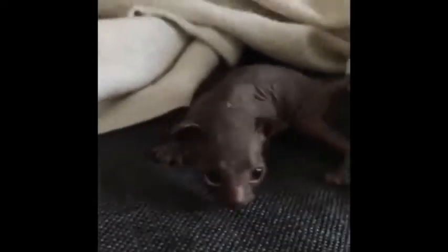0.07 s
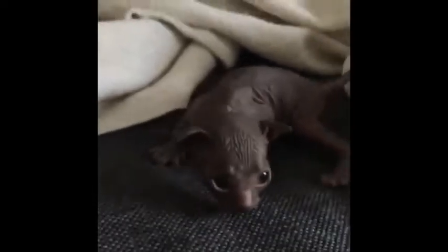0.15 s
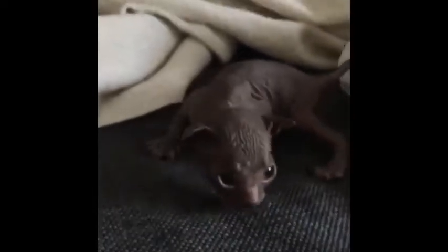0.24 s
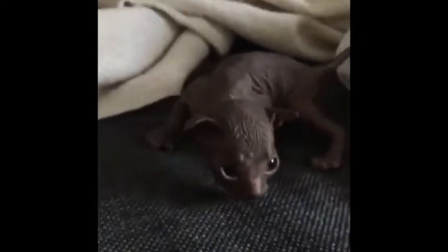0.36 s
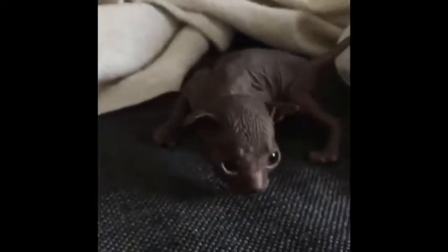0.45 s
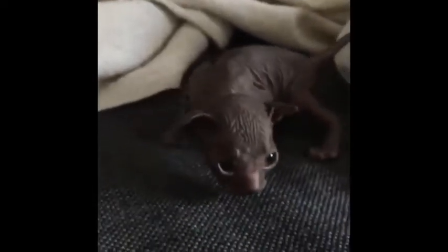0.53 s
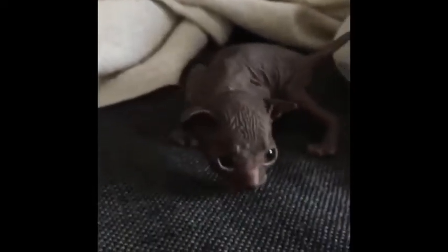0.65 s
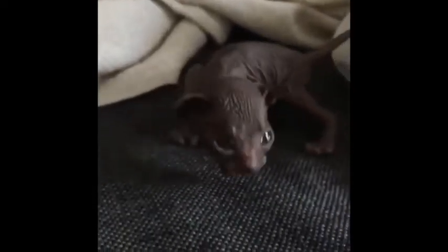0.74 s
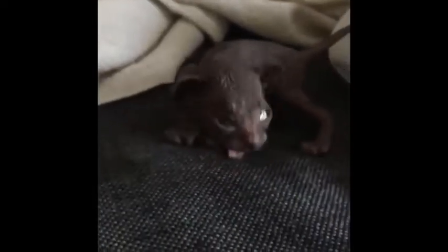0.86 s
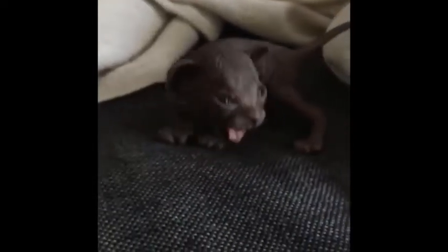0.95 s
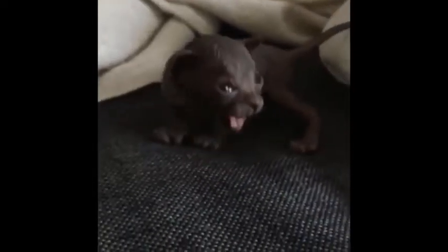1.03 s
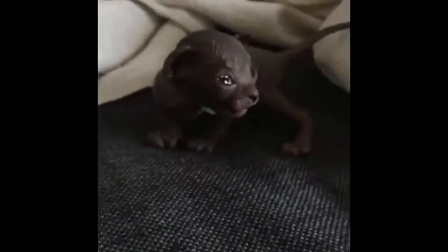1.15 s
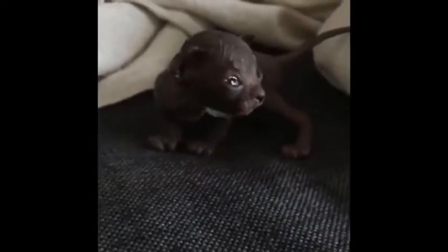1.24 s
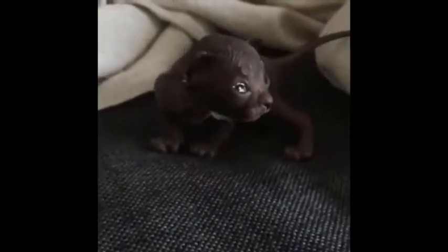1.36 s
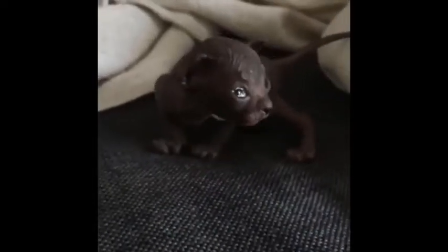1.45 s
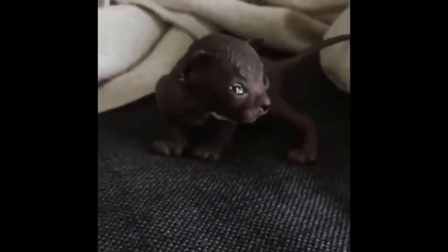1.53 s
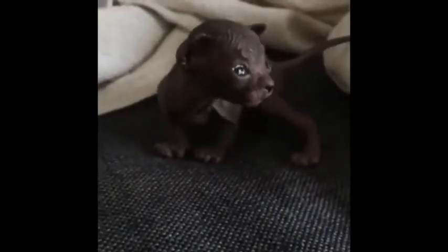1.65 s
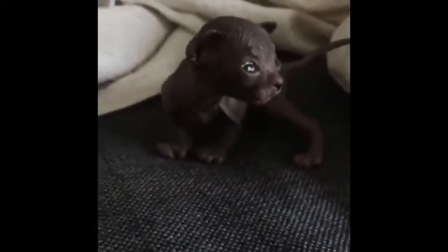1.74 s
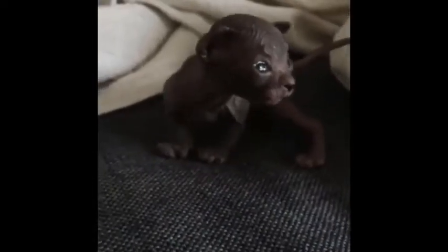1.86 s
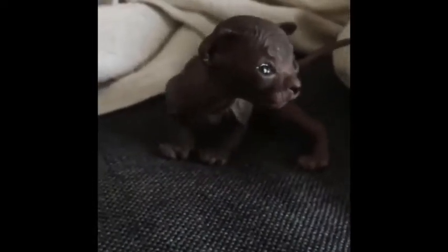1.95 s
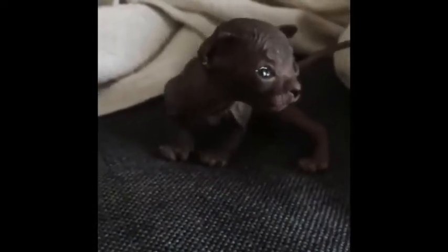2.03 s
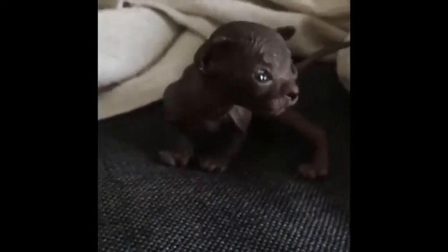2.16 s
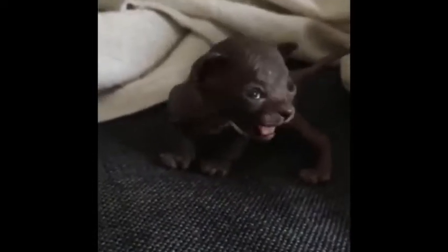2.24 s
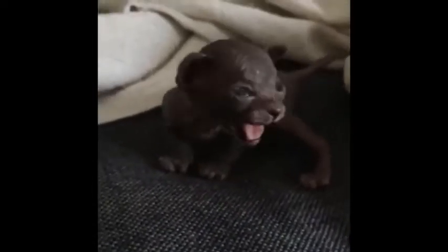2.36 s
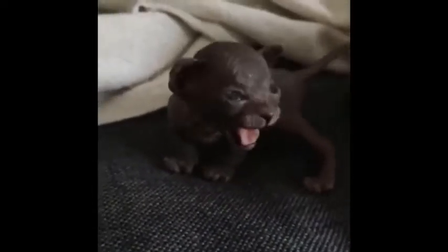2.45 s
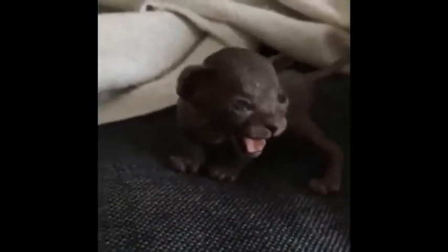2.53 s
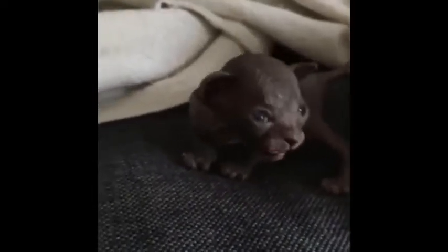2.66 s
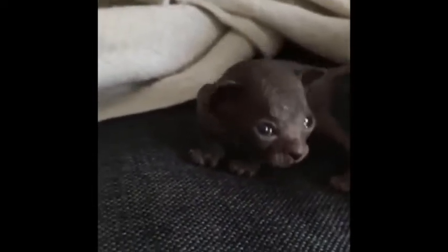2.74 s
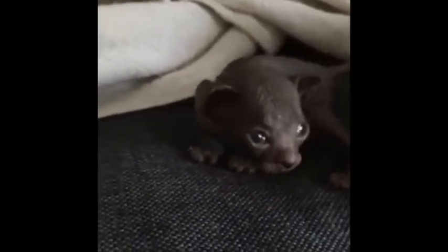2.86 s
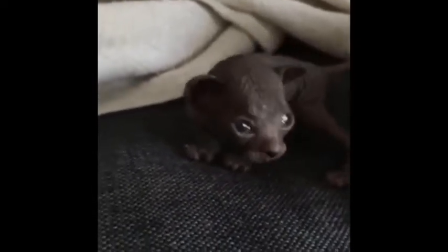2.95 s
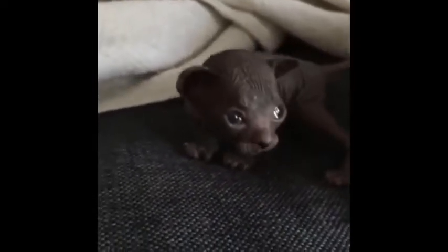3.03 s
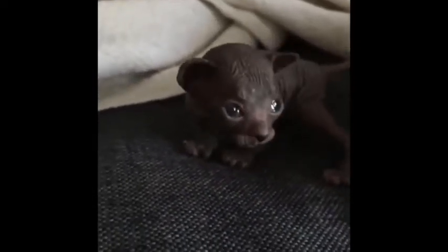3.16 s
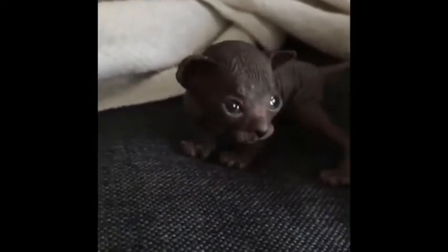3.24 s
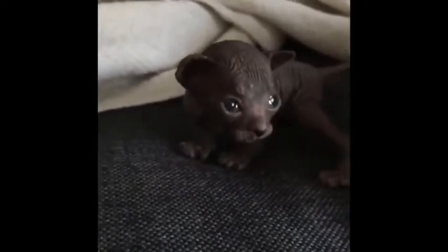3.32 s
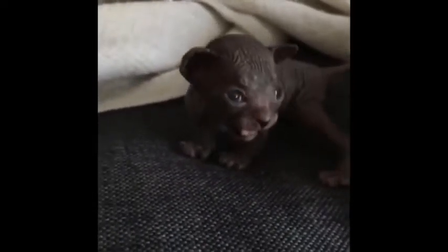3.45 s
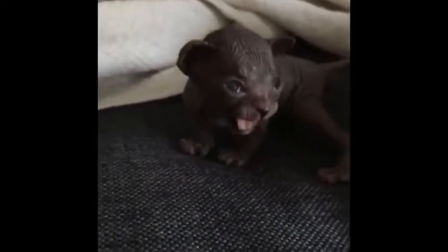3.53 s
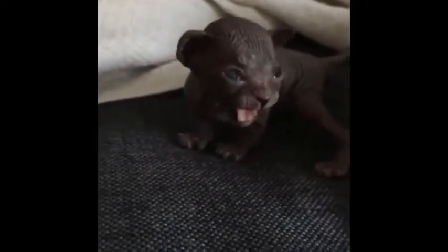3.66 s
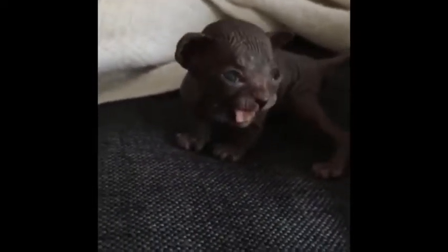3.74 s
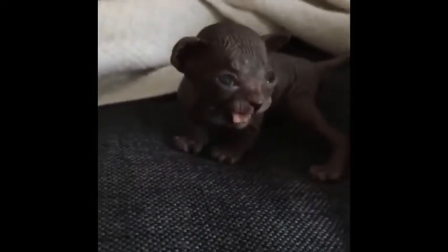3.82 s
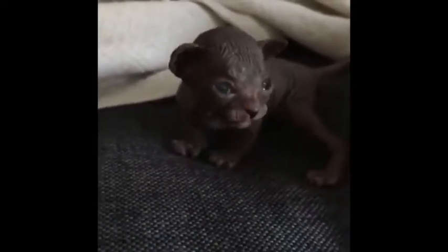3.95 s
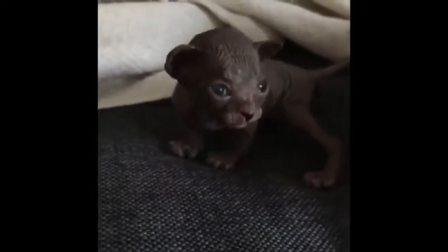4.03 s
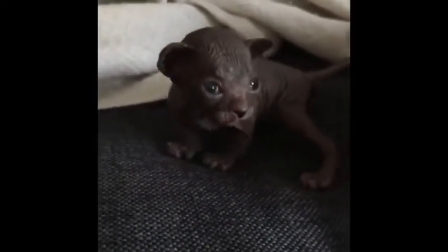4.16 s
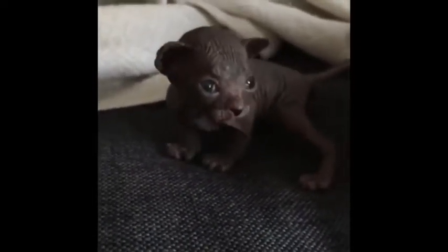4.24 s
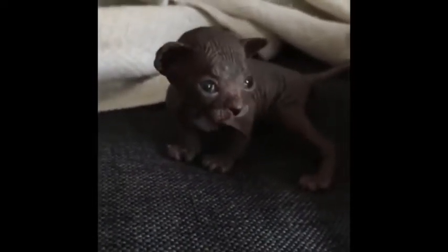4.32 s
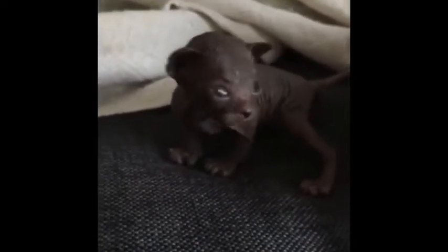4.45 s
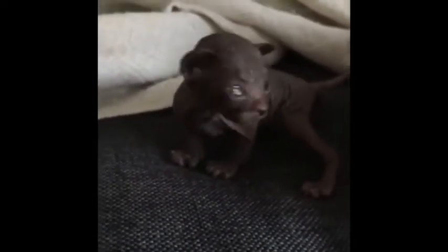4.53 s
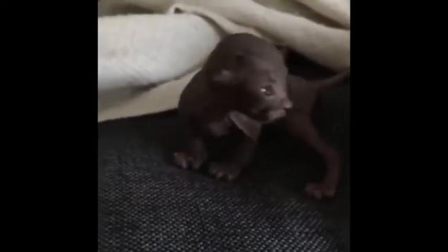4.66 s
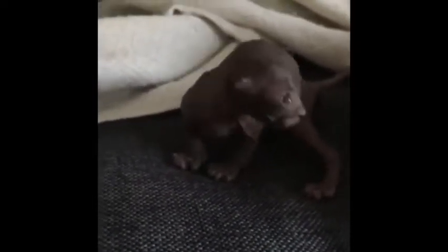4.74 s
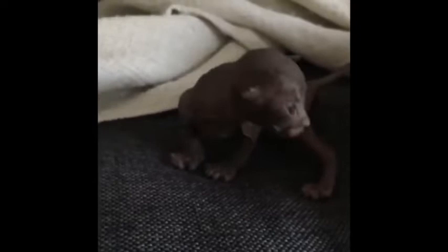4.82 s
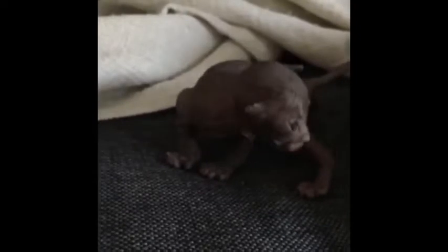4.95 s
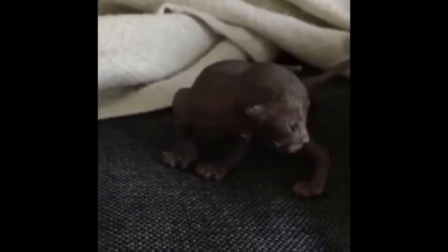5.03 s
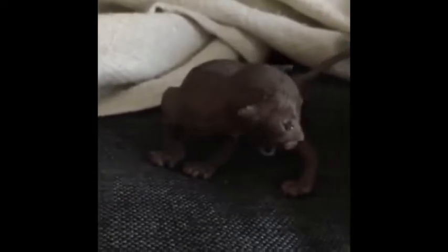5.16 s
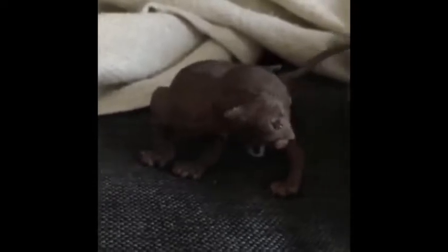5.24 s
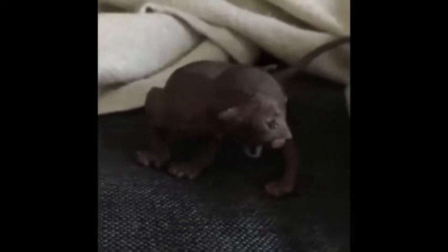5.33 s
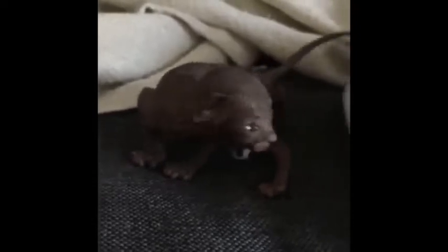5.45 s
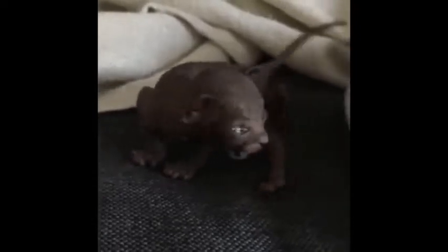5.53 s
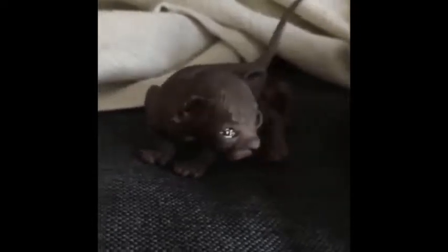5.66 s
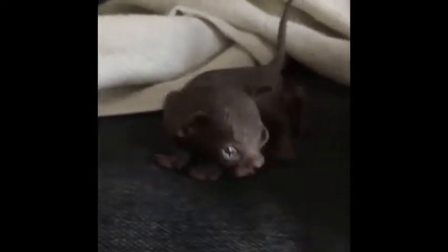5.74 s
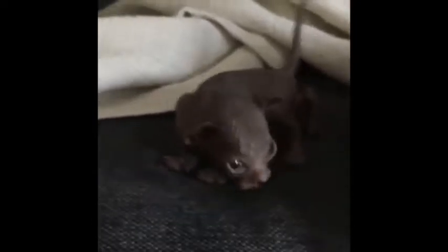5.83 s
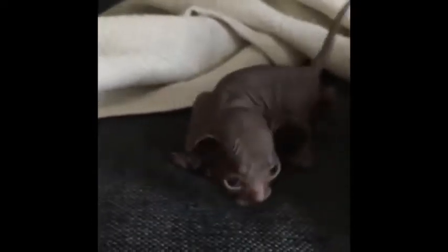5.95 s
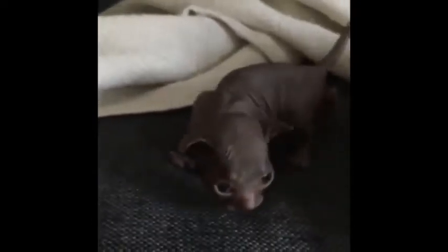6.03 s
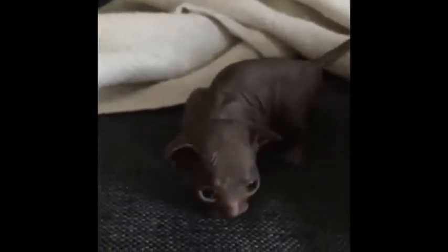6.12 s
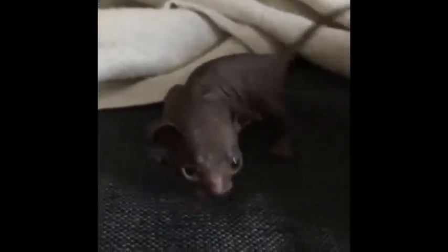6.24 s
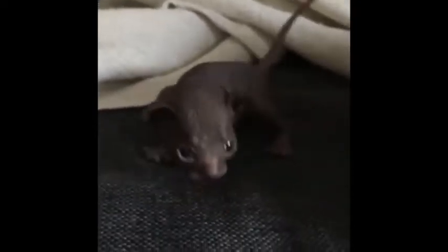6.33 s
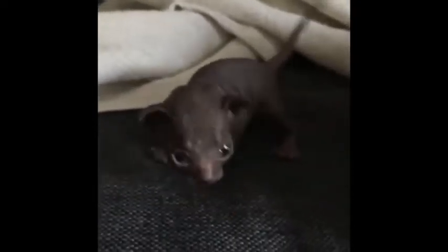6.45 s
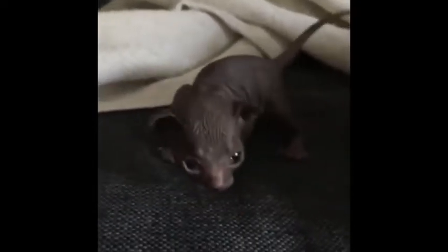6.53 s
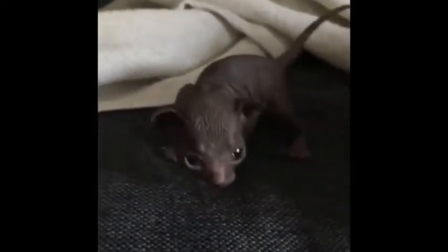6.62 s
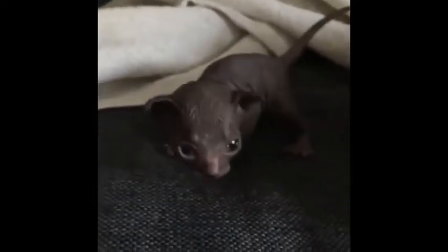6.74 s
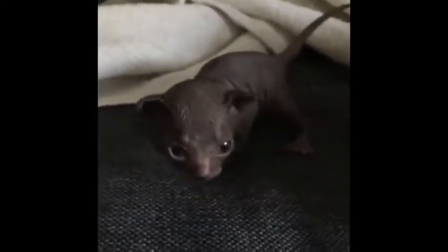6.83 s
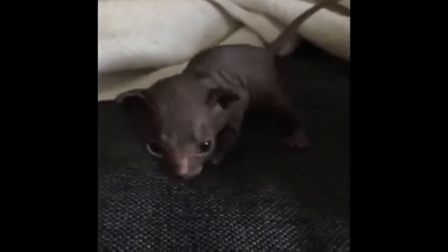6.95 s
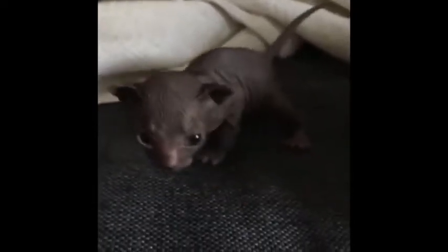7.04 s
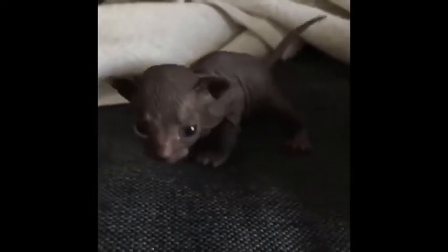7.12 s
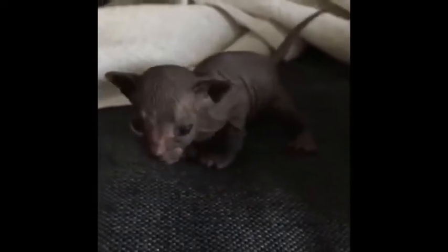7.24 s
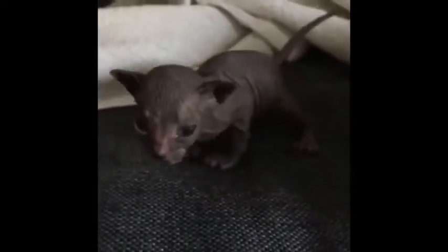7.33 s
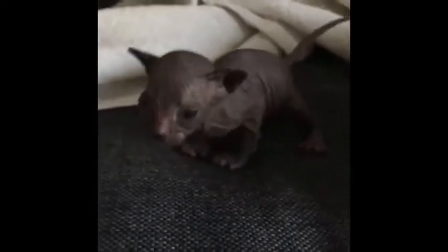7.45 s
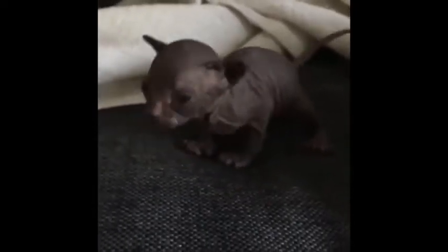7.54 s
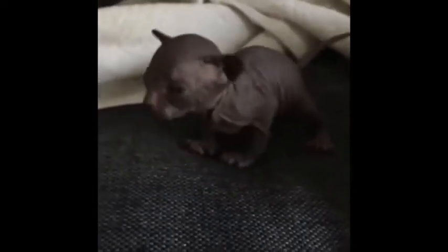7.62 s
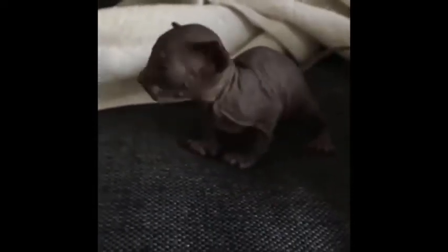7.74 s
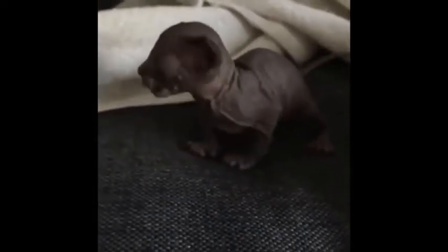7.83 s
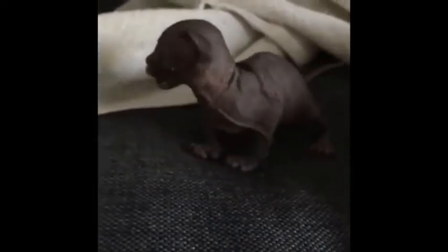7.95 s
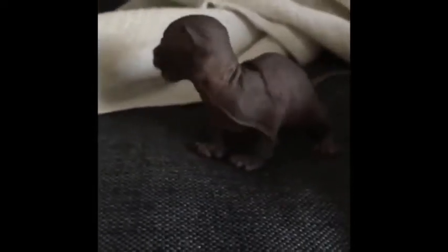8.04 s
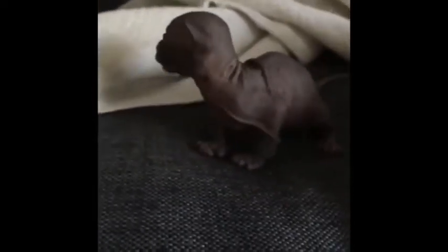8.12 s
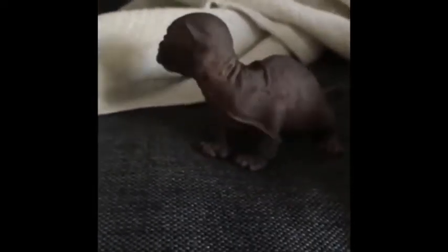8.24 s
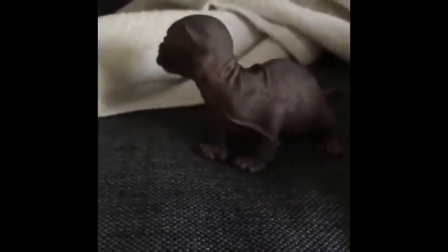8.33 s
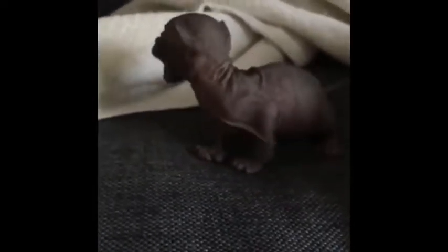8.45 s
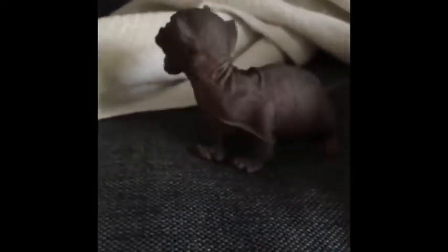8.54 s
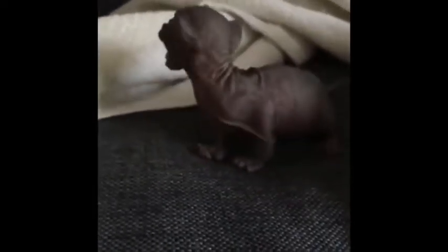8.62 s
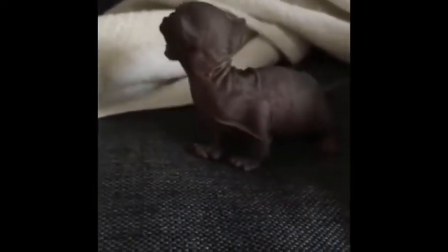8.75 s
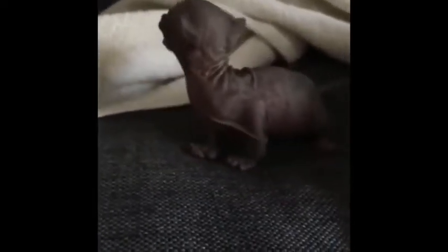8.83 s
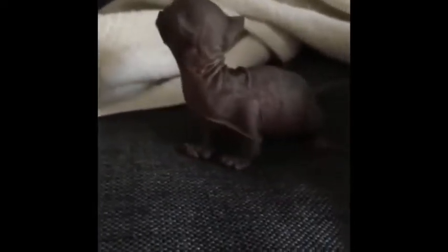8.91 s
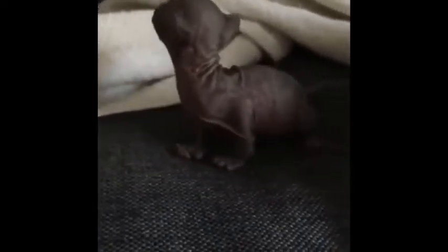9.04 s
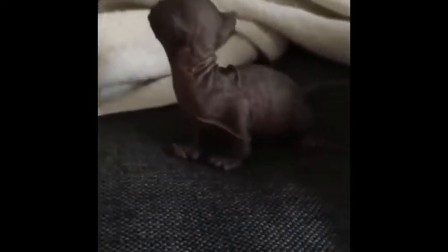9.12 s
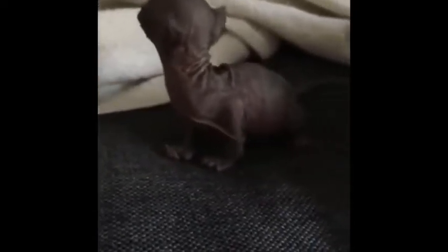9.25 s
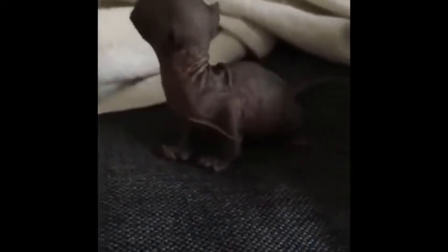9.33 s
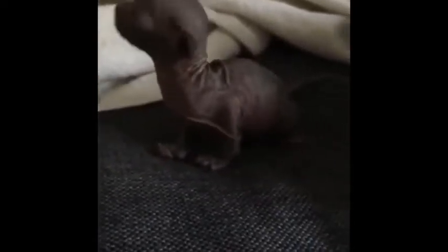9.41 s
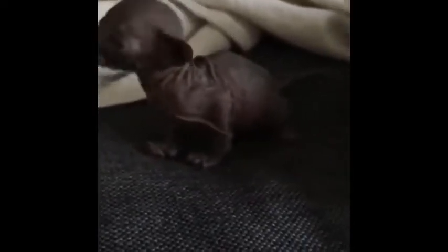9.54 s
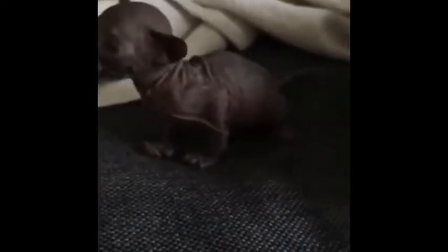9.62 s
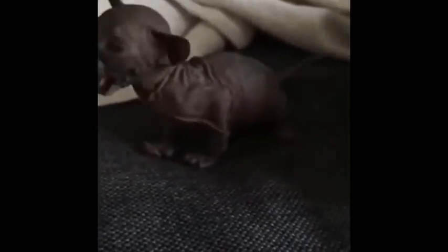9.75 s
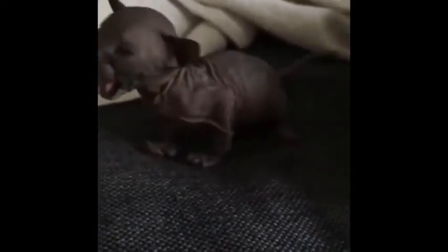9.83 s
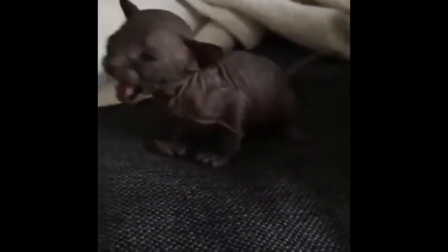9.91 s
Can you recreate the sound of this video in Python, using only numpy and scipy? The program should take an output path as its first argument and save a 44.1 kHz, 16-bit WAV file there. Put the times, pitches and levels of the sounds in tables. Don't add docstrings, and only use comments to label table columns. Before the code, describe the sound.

A soft steady hiss and low rumble run throughout, very close and dry, with barely audible hand bumps on the phone. At 0.75 s a tiny kitten gives a low closed-mouth chirrup and a sharp wet lip smack, then a rasp that clears by 1.2 s into a bright arched cry, ending in a dull lip closure near 1.4 s. A small murmur follows at 1.6. The second mew, 2.3 to 2.85 s, is softer and flicks upward at its end. The third, 3.5 to 4.15, is loudest, rising then falling. The fourth, 5.2 to 5.8, has a long gritty opening and a short cry, then a little chirrup. Cloth rustles gently around 6.3 to 6.8. The fifth, 7.2 to 7.65, has many sticky clicks and a squeaky rise. The sixth, 8.55 to 9.15, jumps from low to high and sags. A seventh starts with chirrups at 9.76 and is cut off.

```python
import sys
import numpy as np
from scipy import signal
from scipy.io import wavfile
from scipy.ndimage import uniform_filter1d

SR = 44100
rng = np.random.default_rng(int(sys.argv[2]) if len(sys.argv) > 2 else 0)


def output_pcm(signal):
    pcm = np.clip(np.atleast_2d(signal).T, -1, 1) * 32767
    wavfile.write(sys.argv[1], SR, np.round(pcm).astype(np.int16))


def how_loud(loudness_db):
    steps = np.asarray(loudness_db, float) / 20
    return 10 ** steps


N = 440118


def evened(x):
    return x / np.sqrt(np.mean(x ** 2) + 1e-20)


def read(points, hz):
    f, value = np.transpose(points)
    return np.interp(np.log(hz + 1), np.log(f + 1), value)


def add(mix, s, sound):
    part = mix[round(s * SR):][:len(sound)]
    part += sound[:len(part)]


def wander(n, span):
    return evened(uniform_filter1d(uniform_filter1d(rng.standard_normal(n), int(span)), int(span)))


def noise(points, patchy_db, swell_db):
    frames, hz = N // 256 + 5, np.fft.rfftfreq(1024, 1 / SR)
    real, imaginary, patches = rng.standard_normal((frames, 513, 3)).T
    patches = uniform_filter1d(patches, size=14, axis=0)
    patches = evened(uniform_filter1d(patches, size=12, axis=1))
    level_db = read(points, hz)[:, None] + patchy_db * patches + swell_db * wander(frames, 6.6)
    z = (real + 1j * imaginary) * how_loud(level_db)
    return evened(signal.istft(z, nperseg=1024, noverlap=768)[1][:N])


def floor_hiss():
    # (frequency [Hz], density [dB per Hz])
    hiss_spectrum = [(15, -49), (28, -23), (79, -2.5), (230, -7.5), (500, -13.5), (877, -14.5),
                     (13400, -23), (14900, -30.5)]
    return how_loud(-65 - 1.11) * noise(hiss_spectrum, 1.0, 0.2357)


def cloth_rustle():
    # (time [s], level [dB])
    stirring = [
        (6.0, -79),
        (6.3, -63),
        (6.5, -64.5),
        (6.9, -75),
    ]
    stir_db = np.interp(np.arange(N) / SR, *np.transpose(stirring))
    cloth_spectrum = [(60, -20), (250, -.1), (900, -8), (3000, -16), (6000, -30)]  # (Hz, dB)
    return how_loud(stir_db - 6) * noise(cloth_spectrum, 2.1, 2.2)


def ring(x, hz, width):
    r = np.exp(-np.pi * width / SR)
    pole = r * np.exp(2j * np.pi * min(hz, .45 * SR) / SR)
    return 2 * signal.lfilter([(1 - r) ** 2], [1, -2 * pole, pole ** 2], x).real


def glide_ring(x, hz, width):
    turn = np.exp(2j * np.pi * np.cumsum(hz) / SR)
    r = np.exp(-np.pi * width / SR)
    return 2 * (turn * signal.lfilter([(1 - r) ** 2], [1, -2 * r, r ** 2], x / turn)).real


def bump(s, length, db, hz):
    u = np.linspace(0, 1, round(length * SR))
    wobble = evened(ring(rng.standard_normal(SR // 2), hz, 50))[:len(u)]
    return s, how_loud(db) * wobble * np.sin(np.pi * u)


def hand_shifts(mix):
    # (time [s], length [s], level [dB], ring [Hz])
    shifts = [
        (.6, 0.11, -72, 70),
        (1.98, .1, -73, 55),
        (2.8, .15, -68, 60.2),
        (5.702, 0.068, -66, 60),
        (7.179, 0.16, -65, 49.7),
        (9.373, .15, -73, 65),
        (9.852, 0.1, -65, 85),
        (1.358, 0.014, -44, 414),
    ]
    for row in shifts:
        add(mix, *bump(*row))


def overtones(points, hz, turns, tilt_db, effort_db, notch, pharynx_db, shimmer_db, sheen_db):
    pharynx_hz, pharynx_width_hz = 2100, 850
    k = np.arange(2, 26)[:, None]
    shimmer_db = shimmer_db * np.array([wander(len(turns), 170) for _ in k])
    f = k * hz
    notch_hz, width, notch_db = notch
    db = read(points, f) + tilt_db * f / 1000 + effort_db * np.clip(f / 1000 - 7.5, 0, 4)
    db += notch_db * np.exp(-((f - notch_hz) / width) ** 2)
    db += pharynx_db * np.exp(-((f - pharynx_hz) / pharynx_width_hz) ** 2)
    db += np.interp(f, [7000, 8300, 10000], [0, *sheen_db])
    weight = how_loud(db) * (f < 13200)
    weight = weight / np.sqrt((weight ** 2).sum(0) / 2 + 1e-9)
    partials = np.cos(2 * np.pi * k * turns - 0.101 * k ** 2)
    return (weight * how_loud(shimmer_db) * partials).sum(0)


def rasp(turns, hz, size, tilt_db, throat_db, tongue_hz, middle_db):
    # (frequency [Hz], width [Hz], level [dB])
    rasp_modes = [(2144, 300, 2.5), (3814, 2000, 7.5), (5200, 580, -4), (6450, 1220, 14.5),
                  (8000, 2950, -2.5), (11100, 8400, -18.5)]
    loose = np.maximum.accumulate(turns + 0.2 * wander(len(turns), 40))
    chance = np.clip(rng.standard_normal(len(turns)), -3, 1.4)
    slaps = np.diff(np.floor(loose), prepend=0) * how_loud(10.0 * chance)
    slaps *= how_loud(3 * np.cos(np.pi * np.floor(loose)))
    air = (0.51 + np.exp(-(loose % 1) / 1.0)) * rng.standard_normal(len(turns))
    drive = 0.54 * evened(slaps) + 0.63 * evened(air)
    gape_db = 9 * np.clip(hz / 400 - 2, 0, 1)
    total = np.zeros(len(turns))
    for i, (f, width, db) in enumerate(rasp_modes):
        lift_db = tilt_db * f / 1000 + throat_db * (f < 2800)
        lift_db = lift_db + middle_db * (2800 < f < 4500) + gape_db * (f > 7600)
        rung = ring(drive, f * size, width) if i else glide_ring(drive, tongue_hz * size, width)
        total += how_loud(db + lift_db) * rung
    return evened(total)


def syllable(rows, shut, tilt_db, rasp_tilt_db, rasp_throat_db, notch, pharynx_db, sheen=(0, 0, 0)):
    # (frequency [Hz], level [dB])
    throat = [(1500, 7.5), (2800, 8), (3700, 10), (4400, -12), (5800, -17), (8000, -5.5), (9500, -26),
              (12000, -12)]
    mouth = [(3000, -15), (3900, -3), (5600, 1), (6900, -1.5), (8200, -18.5), (9700, -27.5), (11300, -22.5),
             (13000, -39)]
    # (time [s], frequency [Hz])
    tongue = [(.95, 2100), (1.05, 2010), (2.5, 2140), (2.6, 2050), (3.66, 2020), (3.8, 2130), (5.37, 2000),
              (5.44, 2350), (5.5, 2000), (5.57, 2180), (7.2, 2140)]
    steady_db, patchy_db = 1.4, 3.2
    pharynx_opens_db = -46.5
    s, *columns = np.transpose(rows)
    t = np.arange(s[0], s[-1], 1 / SR)
    hz, hum_db, throat_db, mouth_db, rasp_db = (np.interp(t, s, c) for c in columns)
    paired = not shut and hz.max() < 800
    turns = np.cumsum(hz * (1 + .0035 * wander(len(t), 180))) / SR
    loudest_db = np.maximum(mouth_db, throat_db)
    uneven = .085 * np.minimum(hz / 1400, 1) ** 1.5 * np.minimum(how_loud(rasp_db - loudest_db), 1)
    shaken = turns + uneven * wander(len(t), 44)
    effort_db = .14 * np.minimum(mouth_db + 36, 0)
    pharynx_db = pharynx_db * np.clip((pharynx_opens_db - np.maximum.accumulate(loudest_db)) / 5, 0, 1)
    notch = np.linspace(*notch[:2], len(t)), *notch[2:]
    colour = notch, pharynx_db, patchy_db if shut else steady_db, sheen[:2]
    rings = rasp_tilt_db, rasp_throat_db, np.interp(t, *np.transpose(tongue)), sheen[2]
    voice = how_loud(hum_db) * np.sqrt(2) * np.cos(2 * np.pi * turns * (2 if paired else 1))
    voice += how_loud(throat_db) * overtones(throat, hz, shaken, 0.5 * tilt_db, 0, *colour)
    voice += how_loud(mouth_db) * overtones(mouth, hz, shaken, tilt_db, effort_db, *colour)
    grit = rasp(turns, hz, .87 if shut else 1, *rings)
    if shut:
        parting = np.pi / 2 * np.linspace(0, 1, len(t)) ** 0.71
        grit = np.sin(parting) * grit + np.cos(parting) * rasp(turns, hz, 0.71, *rings)
    voice += how_loud(rasp_db) * grit
    edges = np.clip(np.minimum(t - s[0], s[-1] - t) / (.002 if shut else .008), 0, 1)
    return s[0], voice * edges


def chirrup(start, length, db, swell_db, unsteady, first_hz, drop_s, held_hz, last_hz, accent_db,
            throat_db, mouth_db, tilt_db, wet_db, wet_s, shut_hz, parted_hz, parting_db, pharynx_db):
    squeak_hz, sag_power, drop_width_s = 1000, 3.6, 0.0025
    undershoot, undershoot_s = .025, .008
    attack_s, attack_db, soft_s_per_db = .003, -16, .001
    release_s, release_db = 0.025, -4.5
    high_overtones_db, fading_overtones_db = -18, -5
    wet_db_per_s, wet_floor_db, wet_tilt_db = -800, -27, 4
    wet_rise_share = 0.7
    u = np.linspace(0, 1, 40)
    t = u * length
    high = 1 / (1 + np.exp((t - drop_s) / drop_width_s))
    sag = u ** (1 if held_hz > squeak_hz else sag_power)
    hz = held_hz + (first_hz - held_hz) * high + (last_hz - held_hz) * sag
    hz = hz * (1 + unsteady * wander(len(u), 4))
    too_far = np.exp(-((t - drop_s) / undershoot_s - 1) ** 2)
    hz = hz * (1 - undershoot * (held_hz < squeak_hz) * too_far)
    attack = np.clip(1.5 - t / (attack_s + soft_s_per_db * max(swell_db, 0)), 0, 1)
    release = np.clip(1 - (length - t) / release_s, 0, 1)
    level_db = db + swell_db * u + attack_db * attack + release_db * release
    over_db = level_db + high_overtones_db * high * np.clip(first_hz / held_hz - 1, 0, 1)
    over_db = over_db + fading_overtones_db * u ** sag_power
    away_s = np.maximum(t - wet_s, wet_rise_share * (wet_s - t))
    rasp_db = wet_db + np.maximum(wet_db_per_s * away_s, wet_floor_db)
    rows = [start + t, hz, level_db + accent_db * high, over_db + throat_db, over_db + mouth_db, rasp_db]
    parting = (shut_hz, parted_hz, 470, parting_db)
    return syllable(np.transpose(rows), True, tilt_db, wet_tilt_db, -5.0, parting, pharynx_db)


def chirrups(mix):
    # (time [s], length [s], hum [dB], swell over the length [dB], unsteadiness of pitch [0-1])
    calls = [(0.754, 0.068, -56.5, 1, 0.06), (1.335, 0.034, -58, 6, 0.04), (1.599, 0.059, -65.5, 7, 0),
             (2.335, 0.08, -51.5, -4, 0.03), (3.544, 0.056, -55.5, 2, 0.02),
             (5.206, 0.091, -51.5, -11, 0.06), (5.769, 0.043, -49, 2, 0.07),
             (7.183, 0.08, -51.5, -5.5, 0.02), (7.263, 0.019, -59, 0.5, 0),
             (7.28, 0.073, -51.5, -14.5, 0.01), (8.551, 0.053, -55.5, -16, 0.05),
             (9.762, 0.053, -51, -4, 0.02), (9.817, 0.063, -61, -8, 0.03), (9.877, 0.041, -67.5, 13, 0.01)]
    # (first [Hz], drop after the start [s], held [Hz], last [Hz], accent before the drop [dB])
    glides = [(820, 0.0089, 520, 470, -3), (616, 0.0081, 540, 390, -8), (1085, 0.01062, 1095, 1110, -6),
              (1336, 0.0095, 715, 560, 6), (800, 0.0015, 700, 610, 0), (1144, .016, 670, 585, 2.5),
              (930, 0.011, 560, 480, -4), (980, .002, 768, 660, 11), (653, 0.004, 635, 660, 5),
              (2140, 0.0034, 2125, 1590, 4), (680, 0.0051, 580, 480, -2), (1014, 0.0067, 735, 460, -1),
              (540, 0.012, 700, 650, -12), (1850, 0.01231, 1870, 1770, 16)]
    # (throat against hum [dB], mouth against hum [dB], brightness [dB per kHz],
    # wet rasp [dB], its moment after the start [s])
    colours = [(1, -3, -5, -46, 0.053), (-15, -26, -1, -60, 0.00454), (-33, -37, -1, -99, .02),
               (-6.5, -2, -8.5, -43.5, 0.064), (-4.5, -7, -7, -51, 0.049), (-5, -13, -22, -52, 0.067),
               (-14.5, -27, -10, -64, 0.011), (-4, -0.5, -6.5, -50.5, 0.063), (4, 11.5, 3, -51, 0.014),
               (-28, 1.5, 0, -61.5, 0.01011), (-0.5, -22, -14, -68, 0.03), (-2.5, -18, -10.5, -42, 0.041),
               (-2.5, 4, 2, -55.5, 0.016), (-8, 8, 1.5, -75, .03)]
    # (first [Hz], last [Hz], lift [dB], pharynx lift [dB])
    partings = [(4100, 4400, 6, 2), (4300, 5000, 0, 2), (4300, 5000, 0, 0), (4000, 7000, 7, -0.5),
                (4200, 6700, 5, 0), (4300, 5300, 3, 2), (4300, 5000, 0, 2), (4200, 6500, 10, 0.5),
                (5500, 5700, 14, 11), (6100, 5300, 7, 0), (5600, 5700, 2, 1), (4300, 5500, 1, -7),
                (5800, 5800, 4, 9), (5400, 5400, -5, 0)]
    for row, glide, colour, parting in zip(calls, glides, colours, partings):
        add(mix, *chirrup(*row, *glide, *colour, *parting))


def fizz(s, length, db, hz, width):
    u = np.linspace(0, 1, round(length * SR))
    grains = rng.standard_normal(2000) * how_loud(2.2 * wander(2000, 30))
    burst = evened(ring(grains, hz, width))[:len(u)]
    return s, how_loud(db) * burst * np.sin(np.pi * u[:2000] ** .7)


def mouth_fizzes(mix):
    # (time [s], length [s], level [dB], ring [Hz], width [Hz])
    fizzes_and_puffs = [(0.925, 0.0052, -64, 6200, 900), (.958, .011, -53, 6400, 900),
                        (0.957, 0.014, -56.5, 2100, 400), (1.342, 0.026, -61.5, 8000, 2400),
                        (3.602, 0.034, -57.5, 5600, 500), (3.606, 0.022, -63, 1940, 540),
                        (3.662, 0.039, -58.5, 1970, 250), (4.116, 0.029, -54, 8800, 4900),
                        (8.555, 0.021, -61, 8200, 1500), (8.557, 0.01762, -63, 5700, 640),
                        (8.6, 0.026, -63.5, 5700, 1200), (9.125, 0.034, -62.5, 7800, 1500),
                        (5.216, .03, -64, 4500, 500), (0.762, 0.055, -56.5, 4300, 600),
                        (7.653, 0.034, -66.5, 2800, 930),
                        (2.827, 0.025, -59.5, 7600, 2600),
        (3.547, .008, -51, 1120, 520),
        (7.183, 0.0079, -52, 1240, 740),
        (2.3, 0.038, -65, 1700, 2100),
        (1.021, .013, -63, 1800, 200),
        (5.236, .029, -64, 5500, 620),
        (9.101, .024, -54, 3040, 840),
        (0.823, .019, -60, 5400, 1300),
    ]
    for row in fizzes_and_puffs:
        add(mix, *fizz(*row))


def smack(s, db, hz, sizzle_db):
    tick = np.zeros(600)
    tick[:40] = rng.standard_normal(40) * how_loud(np.linspace(-34, -16, 40))
    tick[40] = 1
    body = ring(tick, hz, 1500)
    sizzle = ring(tick, 9200, 1900) + .55 * ring(tick, 12500, 2400)
    return s, how_loud(db) * (body / abs(body).max() + how_loud(sizzle_db) * sizzle / abs(sizzle).max())


def smacks(mix):
    # (time [s], peak [dB], ring [Hz], sizzle against the ring [dB])
    snaps = [(0.817, -30, 5010, 3.5), (0.847, -43.5, 4400, 5.5), (2.391, -28, 5600, -16),
             (2.4176, -44.5, 5300, 4), (2.4725, -41, 6030, -25), (2.4882, -36.5, 6170, -19),
             (2.524, -40.5, 5900, -23), (2.8174, -47.5, 7600, -2), (3.5817, -40, 6330, -9),
             (1.329, -49, 6000, -8), (.807, -42, 5400, -3), (5.698, -47, 4100, -20), (1.38, -54, 11000, 1),
             (3.6084, -36.5, 5900, -8), (3.6672, -39, 6100, -26), (5.2767, -49, 5870, 6),
             (5.2876, -41.5, 5350, 1), (7.2426, -37, 6250, -5), (7.2504, -40, 5980, -1),
             (7.268, -42, 5600, -12), (7.2716, -39, 5600, -10), (7.275, -28.5, 6087, -16),
             (3.64, -49, 6000, -4), (3.657, -46, 6300, -14), (8.604, -50, 5883, -18),
             (8.1618, -47.5, 6221, -2), (9.7917, -30.5, 7850, -1), (9.8329, -33.5, 6400, -30)]
    for row in snaps:
        add(mix, *smack(*row))


def split(total_db, lean_db):
    return [total_db - 10 * np.log10(1 + 10 ** (way * lean_db / 10)) for way in (-1, 1)]


def lead_in(start, effort_db, hz, rough, surges):
    opening = np.linspace(0.67, 0.82, len(surges))
    first = (start, hz, effort_db - 9.5, opening[0], rough)
    return [first] + [(s, f, db, o, r) for (s, f, db, r), o in zip(surges, opening)]


def tail(last):
    s, hz, effort_db, opening, rough = last
    return [(s + 0.019, hz, effort_db - 16, opening, 0.86)]


def cry(curve, tilt_db, rasp_tilt_db, rasp_throat_db, hum_lift_db, nasal_db, pharynx_db, sheen):
    opening_db, rough_db = 60, 60
    hum_base_db, hum_follows = -52.5, 0.65
    hum_choke_db, hum_shut_db, hum_flicker_db = -10.5, 8, 8
    hum_late_s, hum_late_db = 0.029, -28
    s, *columns = np.transpose(curve)
    t = np.append(np.arange(s[0], s[-1], 1 / 500), s[-1])
    hz, effort_db, opening, rough = (np.interp(t, s, c) for c in columns)
    rasp_db, clear_db = split(effort_db, rough_db * (rough - .5))
    rasp_db = rasp_db + 1.8 * wander(len(t), 5.7)
    mouth_db, throat_db = split(clear_db, opening_db * (opening - .5))
    hum_db = hum_base_db + hum_lift_db + hum_follows * (effort_db + 39.5) + hum_shut_db * (1 - opening)
    late = np.clip(1 - (t - s[0]) / hum_late_s, 0, 1) ** .5
    hum_db += hum_late_db * max(rough[0] - .5, 0) * 2 * late
    hum_db += rough * (hum_choke_db + hum_flicker_db * rough * wander(len(t), 3.2))
    nose = (4880, 4880, 270, nasal_db)
    rows = np.transpose([t, hz, hum_db, throat_db, mouth_db, rasp_db])
    return syllable(rows, False, tilt_db, rasp_tilt_db, rasp_throat_db, nose, pharynx_db, sheen)


def mews(mix):
    # (time [s], effort [dB], pitch [Hz], roughness [0-1])
    rasps = [
        (0.93, -52, 748, 0.61),
        (2.475, -57.5, 693, 0.55),
        (3.655, -51, 646.4, 0.54),
        (5.349, -56, 680, 0.74),
        (7.35, -57.5, 715, 0.5),
    ]
    # (time [s], pitch [Hz], effort [dB], roughness [0-1])
    rasp_surges = [
        [(.965, 747, -56.5, .66), (1.012, 800, -56, 0.6), (1.022, 899, -54.5, 0.48), (1.05, 842, -54, 0.53)],
        [(2.51, 699, -51.5, 0.74), (2.55, 717, -55.5, 0.47)],
        [(3.72, 740, -58, 0.54), (3.765, 787, -49, 0.6), (3.792, 852, -57.5, 0.58)],
        [(5.42, 687, -53, .69), (5.46, 718, -59.5, 0.68), (5.495, 680, -55.5, 0.69), (5.545, 800, -59, 0.57)],
        [(7.359, 728, -59, .56), (7.365, 726, -61, 0.47)],
    ]
    # (time [s], pitch [Hz], effort [dB], mouth opening [0-1], roughness [0-1])
    first_cry = [(1.075, 948.1, -53, 0.57, 0.45), (1.088, 1167, -59, .4, 0.37),
                 (1.138, 1136, -51, 0.54, 0.21), (1.172, 1386, -40, 0.95, 0.1),
                 (1.22, 1380, -35.5, 0.95, 0.02), (1.242, 1361, -37.5, 0.8, 0.1),
                 (1.258, 1302, -39.5, 0.7, 0.06), (1.29, 1200, -44.5, 0.55, 0.26),
                 (1.314, 1122, -52, 0.48, 0.07)]
    second_cry = [(2.585, 753, -58.5, 0.9, 0.63), (2.61, 910, -56, 0.63, 0.4),
                  (2.665, 1060, -53.5, 0.52, 0.32), (2.677, 1194, -47, 1, 0.22),
                  (2.723, 1289, -44.5, 1, 0.19), (2.743, 1283, -45, 0.8, 0.12),
                  (2.747, 1410, -46, 0.73, 0.24), (2.774, 1556, -59, 0.4453, .33)]
    third_cry = [(3.802, 935, -52.5, 0.57, 0.33), (3.822, 1071, -52, 0.59, 0.31),
                 (3.845, 1108, -52.5, 0.65, 0.36), (3.856, 1268, -51.5, 0.59, 0.34),
                 (3.872, 1443, -52, 0.748, 0.0134), (3.889, 1340, -47, 0.7053, 0),
                 (3.925, 1390, -38, 0.65, 0.13), (3.976, 1346, -37, 0.67, 0.065),
                     (3.979, 1413, -36, 0.67, 0.0585), (4.01, 1376, -32.5, .78, 0.032),
                     (4.04, 1240, -40, .6, 0), (4.065, 1185, -40, .5, 0.28), (4.088, 1088, -43.5, .4, 0.26),
                     (4.109, 955, -46.5, 0.3801, 0.34)]
    fourth_cry = [(5.586, 946, -55, 1, 0.38), (5.599, 1048, -49.5, 0.7, 0.25), (5.62, 1107, -49, .9, 0.2),
                  (5.637, 1247, -49, 0.7725, 0.1), (5.684, 1204, -45, 0.8, 0.17),
                  (5.71, 1170, -52.5, 0.5216, 0.2)]
    fifth_cry = [(7.372, 726, -56.5, 1, .56), (7.385, 980, -53.5, 0.53, 0.55), (7.411, 1079, -51, 1, 0.472),
                 (7.425, 1092, -48.5, 0.84, 0.28), (7.459, 1094, -49.5, 0.99, 0.21),
                 (7.492, 1315, -47.5, 0.88, 0.22), (7.523, 1333, -47, 0.71, 0.29),
                 (7.547, 1520, -59.5, 0.67, 0.31), (7.559, 1570, -61, 0.12, 0.13)]
    sixth_cry_low = [(8.695, 370.5, -70, 0.44, .4), (8.719, 433.5, -69, .5, 0.45),
                     (8.728, 541, -59, 0.6, 0.41), (8.778, 524.6, -56, 0.61, 0.31),
                     (8.8, 690, -52, 0.79, 0.35), (8.82, 700, -55, 0.97, 0.36)]
    sixth_cry = [(8.793, 1356, -46, 0.59, 0.24), (8.81, 1411, -55.5, 0.876, 0.33),
                 (8.838, 1580, -49, 0.8, 0.3), (8.861, 1391, -46.5, 0.73, 0.02),
                 (8.95, 1322, -44.5, 0.6, 0.04), (8.999, 1240, -49, 0.3177, 0.0893),
                 (9.051, 1076, -49.5, 0.2, 0.16), (9.108, 738, -53.5, 0.3, 0.36),
                 (9.122, 763.8, -56.5, 0.35, 0.45)]
    seventh_cry = [(9.916, 892, -59, 0.84, 0.4476), (9.954, 794, -61.5, 0.722, 0.48),
                   (9.965, 1057, -55.5, 0.845, 0.45), (9.98, 1080, -52.5, .95, 0.3747)]
    # (brightness [dB per kHz], brightness of the rasp [dB per kHz],
    # how strongly the rasp rings the throat [dB], hum [dB])
    shapes = [(2, 0, 8.5, 0), (-0.5, 2, 14.5, 1), (1.5, 0, 2, -0.7), (-1.5, 1.5, 21, 0.5),
              (-2.5, 2, 11.5, 4), (1.5, 1, -18, 4.5), (0.56, -5, -11, 1.5), (1.5, -1.5, 5, 9)]
    nasal_dips = [-3, -3, -6.5, 1, 2, -16, -10, -8]
    pharynx_lifts = [12, 11.5, 15, 2, 3, -3, 2, 4]
    # (lift near 8 kHz [dB], lift above 10 kHz [dB], lift of the rasp's middle ring [dB])
    sheens = [(4, -4.5, -1.5), (-7, 5, 1), (-2.5, 0.5, -5), (11, 16, 0.5), (4, 6, -3), (-6, -3, -8),
              (3, -2, -6), (0, -3, -4)]
    curves = [first_cry, second_cry, third_cry, fourth_cry, fifth_cry,
              sixth_cry_low, sixth_cry, seventh_cry]
    leads = [lead_in(*row, surges) for row, surges in zip(rasps, rasp_surges)] + [[], [], []]
    for lead, curve, shape, *colour in zip(leads, curves, shapes, nasal_dips, pharynx_lifts, sheens):
        add(mix, *cry(lead + curve + tail(curve[-1]), *shape, *colour))


def thump(s, db, edge_db):
    push = np.zeros(600)
    push[70] = 1
    push[70:400] += rng.standard_normal(330) * how_loud(np.linspace(-22, -40, 330))
    push = signal.lfilter(*signal.butter(2, 300, "high", fs=SR), push)
    dull = ring(push, 420.0, 370) + 0.36 * ring(push, 1900, 1900)
    edge = ring(push, 6100, 3800)
    return s, how_loud(db) * (dull / abs(dull).max() + how_loud(edge_db) * edge / abs(edge).max())


def lip_closures(mix):
    # (time [s], peak [dB], bright edge against the thump [dB])
    closures = [
        (1.369, -37, -7),
        (2.854, -44, 2),
        (4.146, -48, 1),
        (5.816, -49, -15),
        (7.639, -50.5, 4.5),
        (9.146, -52.5, 1.5),
    ]
    for row in closures:
        add(mix, *thump(*row))


def room(x):
    taps, t = np.zeros(9000), np.arange(9000) / SR
    at = np.arange(120, 8980, 20) + rng.integers(0, 20, 443)
    taps[at] = rng.choice([-1., 1.], len(at))
    taps *= how_loud(-60 * t / .2)
    return signal.fftconvolve(x, taps / np.linalg.norm(taps))[:N]


def scene():
    near = np.zeros(N)
    hand_shifts(near)
    chirrups(near)
    mouth_fizzes(near)
    smacks(near)
    mews(near)
    lip_closures(near)
    echo = how_loud(-23) * room(near)
    mono = near + echo + cloth_rustle() + floor_hiss()
    return np.array([mono, mono])


def roll_off(x):
    return signal.sosfilt(signal.butter(12, 15080, fs=SR, output="sos"), x)


def record(dry):
    # (from [s], to [s], from [Hz], to [Hz])
    loud_swaps = [
        (1.24, 1.26, 5000, 12000),
        (7.485, 7.505, 5700, 6900),
    ]
    low_pass = signal.firwin(255, 14050, window=("kaiser", 9), fs=SR)
    x = signal.oaconvolve(dry, low_pass[None], "same")
    hz, t, z = signal.stft(x[0], SR, nperseg=1024)
    power = (abs(z) ** 2).sum(0)
    quiet = power < 3 * np.median(power)
    bands = np.repeat(rng.random((len(t), 14)) < .3, 37, axis=1).T[:513] & (hz[:, None] > 4400)
    swapped = bands * (rng.random(len(t)) < .14) * quiet * 1.
    for start, end, low_hz, high_hz in loud_swaps:
        swapped[np.ix_((hz > low_hz) & (hz < high_hz), (t > start) & (t < end))] = 1
    spread = np.sqrt(uniform_filter1d(abs(z) ** 2, size=13, axis=0) + 1e-20)
    real, imaginary = rng.standard_normal((2, 2, *z.shape))
    change = signal.istft((spread * (real + 1j * imaginary) - z) * swapped, SR, nperseg=1024)[1]
    return roll_off(x + change[:, :N])


dry = scene()
out = record(dry)
output_pcm(out)
```